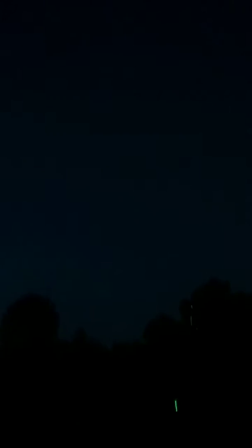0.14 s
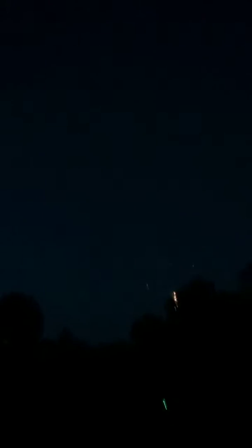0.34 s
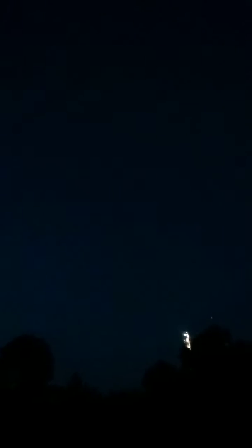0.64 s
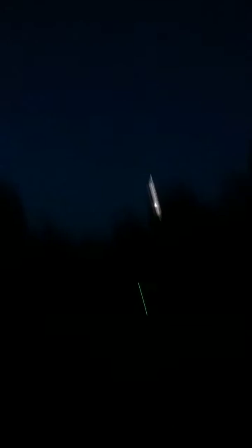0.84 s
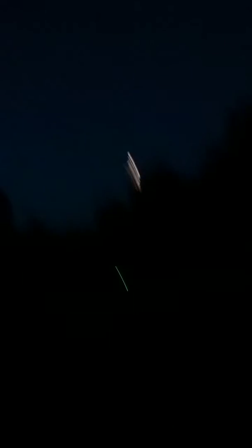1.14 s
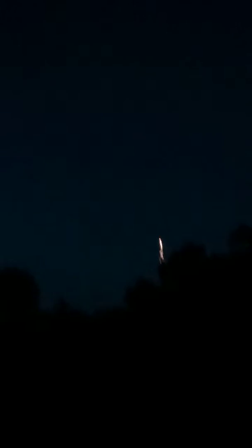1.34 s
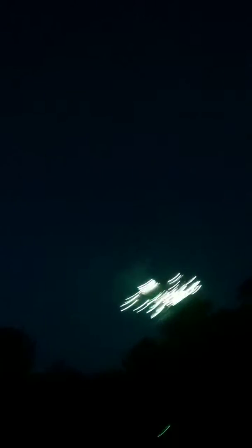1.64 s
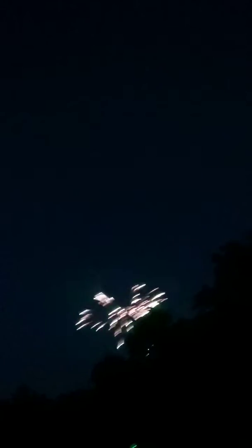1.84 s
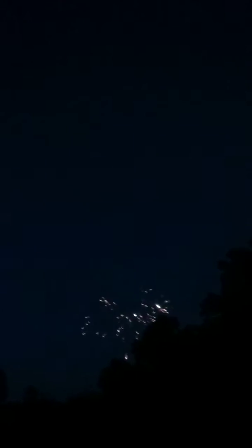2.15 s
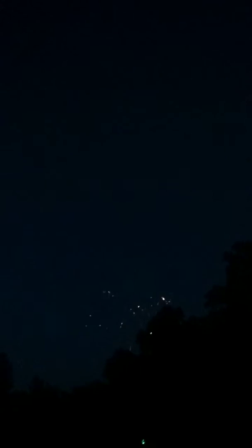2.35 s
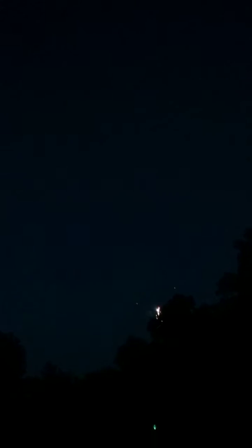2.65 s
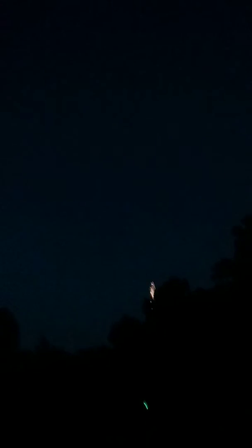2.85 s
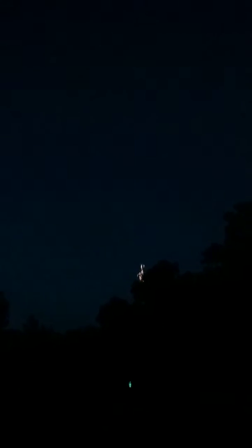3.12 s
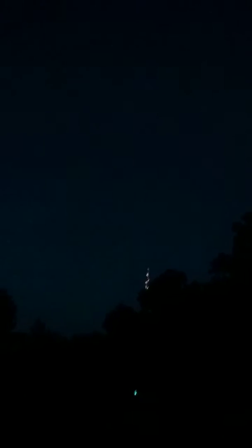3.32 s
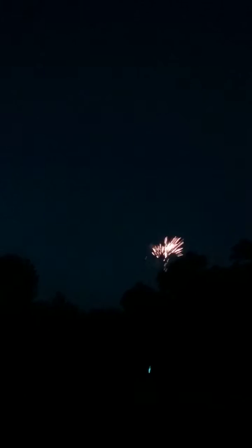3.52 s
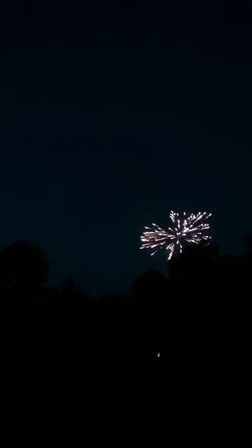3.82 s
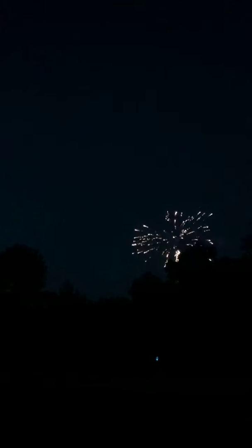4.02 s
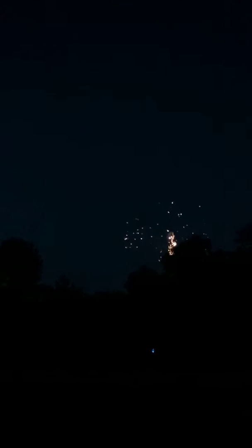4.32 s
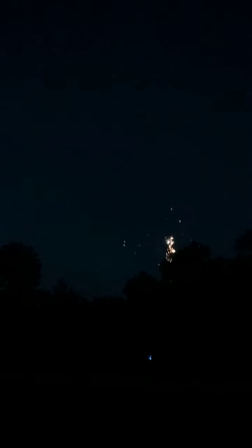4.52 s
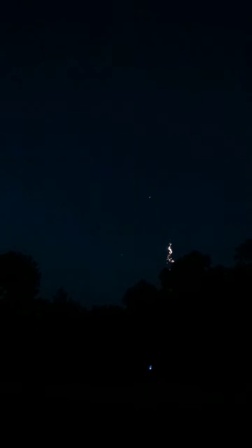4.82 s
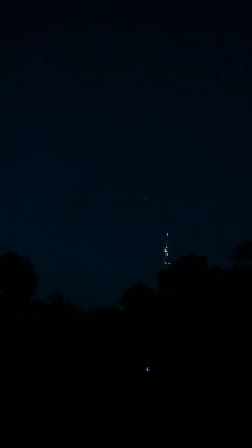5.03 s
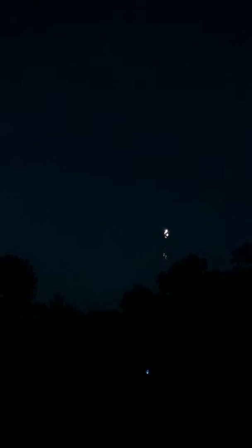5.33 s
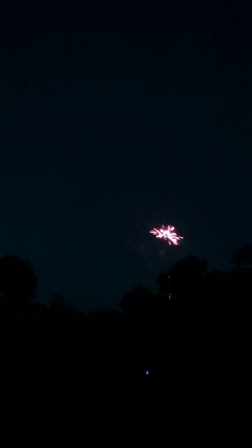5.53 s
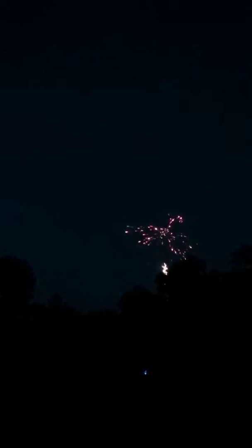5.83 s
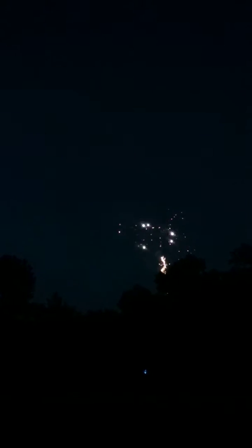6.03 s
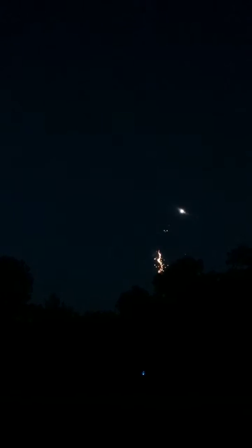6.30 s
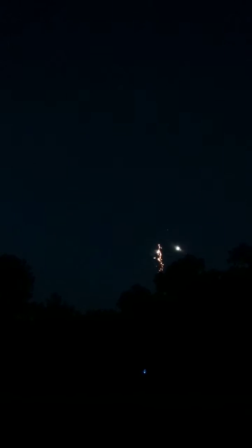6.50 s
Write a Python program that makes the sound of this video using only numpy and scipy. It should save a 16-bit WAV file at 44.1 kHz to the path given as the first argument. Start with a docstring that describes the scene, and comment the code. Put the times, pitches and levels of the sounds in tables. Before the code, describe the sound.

Fireworks over a dark tree-ringed field: dense crackling, then three overloaded bangs about two seconds apart, each echoing off trees and rolling away.

```python
"""A field ringed by trees at night: fireworks, received by a small stereo microphone.
Lift charges launch shells as short pressure waves; burning tails are noise through fluttering resonances.
Stars and sparks are impulses coloured by resonances; bursts are N-waves loud enough to overload the input.
Each burst slaps back once, scatters in the trees as single echoes and decaying noise, and rolls away."""
import sys
import numpy as np
from scipy import signal
from scipy.io import wavfile

SR = 44100
rng = np.random.default_rng(int(sys.argv[2]) if len(sys.argv) > 2 else 0)


def store_pcm(level_fs):
    """Save levels as 16-bit WAV."""
    pcm = np.round(np.clip(level_fs, -1, 1) * 32767).astype(np.int16)
    wavfile.write(sys.argv[1], SR, np.atleast_2d(pcm).T)


N = 293706
TIME = np.arange(N) / SR   # s
COARSE_TIME = TIME[::32]   # s, for slow envelopes

# Levels are relative within each layer, ahead of its filters and gains.
# night air: f/Hz, spectral density level/dB
NIGHT_AIR = [(25, -51), (60, -5.5), (150, -3.5), (400, 0), (700, 6.5), (1200, -4), (3000, -13.5),
             (6000, -63), (15000, -50)]
# scatter from the trees: f/Hz, spectral density level/dB, decay time t60/s
TREE_SCATTER = [(30, -30, 0.45), (70, -7, 0.79), (149, -1.5, 1.18), (354, 3, 0.85), (790, 0, 1.25),
                (1140, -8, 1.77), (1590, -5, 1.62), (2040, -6.5, 1.37), (3630, -8, 0.97), (5270, -18, 0.83),
                (7350, -83, 0.28), (15000, -112, .5)]
# distant roll: f/Hz, spectral density level/dB, decay time t60/s
DISTANT_ROLL = [(30, -12, 2), (82.5, -17.5, 3.1), (176, -2, 5.2), (356, 0, 5.03), (730, -3, 3.85),
                (1030, -6.5, 2), (2450, -26, 7.9), (6000, -55, 1.8), (15000, -73, 1)]
# diffuse sound: f/Hz, left-right likeness/1, left-right level/dB
DIFFUSE_FIELD = [(60, 0.94, -1), (296, 0.97, 2.5), (620, 0.88, 3), (1270, 0.86, 5.5), (1950, 0.03, 4),
                 (3820, 0.03, -1.5), (6340, 0.067, -8), (12000, 0.17, 12)]
# microphone port resonances, left list then right list: f/Hz, width/Hz, level/dB
PORT_MODES = [
    [(614, 160, 0), (847, 254, 2.5), (1165, 62, 3), (1787, 144, 5), (3420, 1360, 2), (3560, 370, 9.5),
     (5000, 200, -52)],
    [(656, 240, -11), (848, 77, 3.5), (1420, 42, -6.5), (2047, 62, 8), (3080, 1900, 6), (3720, 780, 9),
     (4570, 220, -1.5), (5500, 3100, -6)],
]
# upper resonances of the burning jet: f/Hz, width/Hz, level/dB
HISS_MODES = [(4190, 870, 1.5), (5680, 920, -7)]
# lower resonances of the burning jet: f/Hz, width/Hz, level/dB
RUSH_MODES = [(1890, 580, -2.5), (2924, 360, 2)]
# burning tail of each climbing shell:
# full flame from t/s, until t/s, swell/(dB/s), high hiss level/dB, lower rush level/dB
CLIMBING_TAILS = [(1.645, 1.94, 28, -39.5, -36), (3.506, 4.004, 27, -43, -37.5),
                  (5.69, 5.894, 18.5, -43, -37.5), (6.4, 6.7, 38, -55, -50)]
# showers of sparks: thickest at t/s, build-up/s, fade/s, snap level/dB, pop level/dB
SPARK_SHOWERS = [(.345, 0.037, 0.028, -35, -26), (0.449, 0.041, 0.053, -27, -20.5),
                 (0.801, 0.5, 0.29, -40.5, -37.5), (1.24, 0.29, 0.28, -29, -27),
                 (3.22, 0.34, 0.19, -38, -50), (4.7, 0.4, 0.3, -35, -46), (6.28, 0.23, 0.5, -35.5, -44),
                 (6.635, 0.031, .1, -26.5, -23)]
# loudest crackling stars: t/s, peak level/dB, left-right level/dB, nominal colour f/Hz
STAR_CRACKS = [(0.2083, -28.5, 2, 2980), (0.2631, -22, 1, 2660), (0.2713, -22, 6, 2930),
               (0.2908, -15.5, 6, 2700), (0.3075, -17, -5, 2760), (0.3132, -22, 6, 2400),
               (0.328, -26, 0, 2200), (0.333, -27, 3, 2800), (0.3404, -13.5, 8, 2370),
               (0.3468, -14, 1, 2660), (0.36, -21, -1, 2580), (0.38, -21, 5, 2600),
               (0.3442, -19, -11, 2740), (0.3517, -16.5, 12, 2740), (0.3967, -16.5, 1, 2670),
               (0.404, -27, 3, 2780), (0.4187, -20, 2, 3080), (0.425, -19, 5, 2690),
               (0.4335, -13.5, -1, 2900), (0.4425, -16, 5, 3060), (0.456, -12, 1, 2640),
               (0.464, -21, 4, 2700), (0.4737, -23, 7, 2790), (0.483, -19.5, 1, 2930),
               (0.496, -20.5, 7, 3150), (0.5114, -21.5, 1, 2500), (0.523, -25, 5, 3160),
               (0.5755, -24, 7, 2800), (0.5646, -18.5, 3.5, 1610), (0.6131, -18.5, 1, 2540),
               (0.654, -20.5, 7, 2870), (0.721, -23, 5, 2080), (0.7504, -14.5, 7, 2600),
               (0.778, -22, 2, 2050), (0.792, -14.5, 2, 1820), (0.8456, -10, 1.5, 2300),
               (0.916, -25, 16, 3100), (0.9707, -12.5, 0, 2040), (0.9959, -19.5, 10, 3000),
               (1.011, -27, 15, 2800), (1.035, -23, 13, 2880), (1.089, -18.5, 18.5, 3270),
               (1.105, -22.5, -5, 2530), (1.157, -23, 7, 3000), (1.183, -13.5, -4, 2840),
               (1.1874, -12, 8, 3100), (1.198, -17, 16, 3160), (1.2024, -13, 3, 3360),
               (1.21, -12.5, -4, 3200), (1.2176, -11, 4, 3300), (1.2625, -8, 10, 2520),
               (1.2674, -4, -5, 3100), (1.2785, -8.5, 4, 2640), (1.2833, -10.5, -8, 3300),
               (1.2925, -7.5, 8, 2220), (1.2947, -15, -11, 2110), (1.3078, -11.5, 1, 3750),
               (1.3363, -6.5, -3, 3320), (1.3485, -13, 6, 3200), (1.3636, -17, -2, 3100),
               (1.371, -3, 1, 3280), (1.4138, -3.5, -3, 3360), (1.4974, -7, -2, 3220),
               (1.517, -17.5, 4, 3000), (1.574, -2.5, 0.5, 2810), (1.6033, -13, 1, 2780),
               (1.7581, -10, 1, 2620), (2.1519, -12, -0.5, 2600), (2.2103, -13.5, -5, 2630),
               (2.4647, -19.5, -3, 2580), (2.825, -28, 1, 2500), (2.9536, -33, -1, 3600),
               (3.032, -30, -6, 3400), (3.075, -28.5, 0, 3400), (3.147, -23, -3, 3540),
               (3.1955, -22.5, -5, 3200), (3.2027, -21, 3, 2940), (3.2086, -25, 3, 3650),
               (3.2223, -23, 1, 3500), (3.2355, -22, 2, 3330), (3.2447, -27, -2, 3880),
               (3.3222, -16, 0, 3180), (3.4295, -12.5, -1, 2950), (3.447, -21, -2, 3000),
               (3.4638, -15, 2, 2700), (3.5347, -18.5, 10, 2600), (3.5452, -7.5, 2, 2960),
               (3.5852, -19, 2, 2900), (4.3996, -22, 1, 3060), (4.511, -23, 2, 2600),
               (4.5761, -25, 3, 2700), (4.5901, -24.5, 0, 2800), (4.6306, -27, 16, 2500),
               (4.637, -18.5, 2, 2570), (4.6945, -23, 0, 3300), (4.703, -21.5, 5, 2740),
               (4.721, -23.5, 1, 3100), (4.751, -17.5, 1, 2890), (4.7823, -27, 1, 3200),
               (4.811, -22, 2, 2950), (4.8252, -24.5, -3, 2780), (4.8375, -31, 2, 3000),
               (4.8486, -19.5, -2, 2950), (4.879, -19, 3, 2750), (4.8881, -23, -3, 2890),
               (4.9076, -23.5, -1, 2980), (4.9424, -23, -2, 2730), (4.9902, -27, 1, 3200),
               (5.0376, -21, 7, 2800), (5.0428, -17.5, -1, 3250), (5.061, -15, 0, 3000),
               (5.069, -18, -1, 2820), (5.0975, -20, 4, 2840), (5.193, -22.5, 2, 3100),
               (5.5498, -11, 1, 2900), (5.7157, -20, 2, 3020), (5.8662, -8, 4.5, 2690),
               (5.9434, -20.5, 6, 2210), (6.1016, -5, -3, 2880), (6.2314, -27, 2, 2490),
               (6.3206, -12.5, 1, 2600), (6.333, -23, -2, 2980), (6.3903, -32, -2, 3000),
               (6.449, -28, -6, 3080), (6.533, -22.5, 2, 3000), (6.5471, -16, -5, 2630),
               (6.5538, -13, 1, 2900), (6.5609, -26, -1, 3000), (6.5939, -21, 4, 2600),
               (6.6, -20, -2, 2940), (6.606, -13.5, 1, 2790), (6.6127, -25, -1, 2700),
               (6.6333, -17.5, 6, 2820), (6.6431, -16.5, 3, 3000), (6.6502, -10.5, -4, 3200)]
# rings after a crack, the upper ones mainly on the right: f/Hz, width/Hz, left level/dB, right level/dB
STAR_RINGS = [(1170, 91, 4, 2), (1855, 400, -13, -8), (3914, 650, -23, 5), (5500, 900, -20, 4)]
# soft, dull thuds behind the crackle: t/s, level/dB, f/Hz
DULL_THUDS = [(0.759, -41, 328), (0.821, -36, 420), (0.839, -50, 110), (.86, -42, 300), (1.271, -34, 410),
              (1.282, -44.5, 149), (1.297, -39, 330), (5.186, -48, 102)]
# lift charges: t/s, blast level/dB, pulse length/ms, dull above f/Hz,
# slap delay/ms, slap f/Hz, slap level/dB, tree scatter level/dB
LIFT_CHARGES = [(1.849, -12, 0.81, 2600, 10.3, 290, -12.5, -17.5),
                (3.5421, -14.5, 0.91, 2600, 9.5, 277, -15, -15),
                (5.2993, -19, 0.66, 3640, 8.5, 275, -18.5, -15)]
# strong returns from the tree line: t/s, level/dB, f/Hz
TREE_RETURNS = [(1.972, -15, 846), (1.981, -18.5, 192), (2.0140, -14, 587), (4.0125, -11, 700),
                (4.015, -17, 1450), (4.0225, -12.5, 520), (4.024, -20, 235), (4.034, -23, 179),
                (4.068, -33, 600), (4.135, -21, 716), (6.0400, -17, 880), (6.046, -16, 560),
                (6.158, -31, 900), (6.2010, -29, 288)]
# thick stands of branches that return a bright rattle: t/s, fade/s, level/dB
BRANCH_RATTLES = [(1.953, 0.032, -32), (4.001, 0.037, -18.5), (4.125, 0.028, -24), (6.036, 0.028, -28)]
# a shell that burst before the start:
# t/s, tree scatter level/dB, far roll level/dB, scatter tilt/(dB/octave), body f/Hz
PAST_BURST = (-.3, -2, -3, -.5, 780)
# shell bursts: t/s, blast level/dB, pulse length/ms, slap delay/ms, slap level/dB, tree scatter level/dB,
# far roll level/dB, scatter tilt/(dB/octave), body f/Hz, bounce delay/ms, knock f/Hz, knock level/dB,
# slap f/Hz, ground thud level/dB
SHELL_BURSTS = [(1.9177, 12, 0.65, 9, 1, -2, -1, -0.5, 715, 1.13, 538, 6, 504, -17),
                (3.9637, 11, 0.422, 10.1, -2.5, -0.5, 2, 0.1, 670, 1.37, 493, 9.5, 470, -12),
                (5.9707, 8.5, .55, 9.45, -0.5, -4.5, -5.5, 0.75, 920, 1.2, 844, 9.5, 510, -22)]

PORT_LAG_MS = 0.08
WALL_ECHO_MS, WALL_ECHO_DB = 10, -4   # a surface close by repeats what arrives from afar
BODY_DB, BODY_OCTAVES = 6, 0.26   # the echoes of a burst are strongest round its body pitch
MUZZLE_SCATTER_S = 0.014   # the scatter of a lift charge follows its first echo
# the roll drops once the farthest trees have answered
ROLL_END_S, ROLL_END_FADE_S, ROLL_END_DB = 1.144, 0.03, -5
BURN_OUT_DB_PER_S = 40
EMBER_HISS_DB, EMBER_RUSH_DB = -54, -50   # embers never quite stop hissing
FIZZ_DB = -11.5   # rush of a shower, relative to the size of its snaps
HISS_PAN_DB, RUSH_PAN_DB = -2, 1.4   # left-right
SNAPS_PER_S, POPS_PER_S = 220, 100   # mean rates where a shower is thickest, before clumping
STRAY_SNAPS_PER_S, STRAY_DB = 11, -59   # between showers
EDGE_RISE_DB = 1   # sparks are this much larger one build-up or fade time from the thickest moment
CRACK_WIDTH_HZ, CRACK_TOP_HZ = 2280, 4350   # a crack is a quick swing; its top shifts with its colour
CRACK_BOUNCE_MS, CRACK_BOUNCE_DB = 2.2, -7.5   # bounce off the ground; the delay varies among stars
# the crackle is hollow between its low pop and its high snap
CRACK_DIP_HZ, CRACK_DIP_WIDTH_HZ, CRACK_DIP_SHARE = 2570, 260, 0.56
BRANCHES_PER_S, BRANCH_DB, BRANCH_T60_S = 890, -26, 1   # branches return a report as a dense rattle
STOPBAND_HZ = 16900


def from_db(db):
    """Level definition: amplitude ratio is ten to the power of level over twenty."""
    return 10 ** (np.asarray(db) / 20)


def rms_one(x):
    """Normalisation: division by the root mean square."""
    return x / np.sqrt(np.mean(x ** 2) + 1e-20)


def at_hz(rows, hz):
    """Spectral interpolation: each column is linear in log frequency."""
    points, *columns = np.transpose(rows)
    return [np.interp(np.log(hz), np.log(points), column) for column in columns]


def cut(x, hz, kind, order=2):
    """Causal Butterworth filtering: a maximally flat passband."""
    sections = signal.butter(order, hz, kind, fs=SR, output="sos")
    return signal.sosfilt(sections, x + 1e-18)


def resonate(x, hz, width_hz):
    """Damped resonance: a conjugate pole pair with a gain of about 1 at its peak."""
    radius = np.exp(-np.pi * width_hz / SR)
    zeros = np.array([1, 0, -1]) * (1 - radius * radius) / 2
    poles = [1, -2 * radius * np.cos(2 * np.pi * hz / SR), radius * radius]
    return signal.lfilter(zeros, poles, x + 1e-18)


def drift(per_s, times=TIME):
    """Slow random fluctuation: normal values of unit spread joined by straight lines."""
    knots = rng.standard_normal(4096)
    return np.interp(times * per_s, np.arange(len(knots)), knots)


def pan(left_db):
    """Interchannel level difference: half is given to the left, half taken from the right."""
    return from_db(np.array([[.5], [-.5]]) * left_db)


def delayed(x, ms):
    """Propagation delay: the same wave, arriving later."""
    def shift(wave):
        return np.interp(TIME - ms / 1000, TIME, wave, left=0)
    return np.apply_along_axis(shift, -1, x)


def through_ports(x, leak_db):
    """Cavity resonance: a sharp wave rings each port, the right one later; some passes straight through."""
    rung = []
    for side, modes in zip(np.broadcast_to(x, (2, N)), PORT_MODES):
        # neighbouring modes alternate in polarity
        rung.append(sum((-1) ** k * from_db(db) * resonate(side, hz, width)
                        for k, (hz, width, db) in enumerate(modes)))
    left, right = rung
    return np.array([left, delayed(right, PORT_LAG_MS)]) + from_db(leak_db) * x


def shock(s, length_ms):
    """The N-wave of a blast: a jump up to 1, a straight fall, a jump back."""
    phase = (TIME - s) * 1000 / length_ms
    return np.where((phase >= 0) & (phase < 1), 1 - 2 * phase, 0)


def dull_echo(s, hz, cycles):
    """Treble-poor reflection: a few swings whose envelope reaches 1 after the given cycles and dies away."""
    out = np.zeros(N)
    span = slice(int(s * SR), int(s * SR) + SR // 4)
    turns = (TIME[span] - s) * hz
    age = turns / cycles
    out[span] = -np.sin(2 * np.pi * turns) * (age * np.exp(1 - age)) ** 2
    return out


def random_clicks(per_s, size_db, spread_db):
    """Poisson-like impulses: random moments, mostly small sizes, each from a direction of its own."""
    born = np.flatnonzero(rng.random(N) < per_s / SR)
    sign = rng.choice([-1, 1], N)
    size = np.minimum(rng.exponential(1, N), 3)
    left_db = rng.normal(0.93, 10.2, N)
    out = np.zeros((2, N))
    gain = from_db(size_db[born] + spread_db * size[born])
    out[:, born] = sign[born] * gain * pan(left_db[born])
    return out


def diffuse_bands():
    """Diffuse field: third-octave bands of white noise (Hz, stereo) with a set left-right coherence."""
    edges = 25 * 2 ** (np.arange(29) / 3)
    white = rng.standard_normal((2, 2, N))
    for k, (low, high) in enumerate(zip(edges, edges[1:])):
        hz = np.sqrt(low * high)
        # neighbouring bands use different noise
        mid, side = cut(white[k % 2], [low, high], "band")
        alike, left_db = at_hz(DIFFUSE_FIELD, hz)
        stereo = np.sqrt(1 + alike) * mid + np.sqrt(1 - alike) * side * [[1], [-1]]
        yield hz, pan(left_db) * stereo


def echo_power(s, db, t60, arrival_s, build_s):
    """Reverberant power: many small echoes build up after a report and decay exponentially."""
    age = np.maximum(COARSE_TIME - s - arrival_s, 0)
    return from_db(db - 60 * age / t60) ** 2 * (1 - np.exp(-age / build_s)) ** 2


def landscape():
    """Scattering and reverberation: reports spread in the trees, then roll, over the rush of the night."""
    out, lumps = 0, drift(70, COARSE_TIME)
    reports = [PAST_BURST] + [(row[0], *row[5:9]) for row in SHELL_BURSTS]
    for hz, noise in diffuse_bands():
        tree_db, tree_t60 = at_hz(TREE_SCATTER, hz)
        roll_db, roll_t60 = at_hz(DISTANT_ROLL, hz)
        octaves = np.log2(hz / 700)
        power = from_db(at_hz(NIGHT_AIR, hz)[0] - 43.0) ** 2
        for s, near_db, far_db, tilt_db, body_hz in reports:
            body = np.exp(-(np.log2(hz / body_hz) / BODY_OCTAVES) ** 2)
            scatter_db = tree_db + near_db + tilt_db * octaves + BODY_DB * body
            # ground: lows swell later
            power = power + echo_power(s, scatter_db - 7.0, 0.08, arrival_s=0.0019, build_s=1.2 / hz)
            power = power + echo_power(s, scatter_db - 15.5, tree_t60, arrival_s=0.026, build_s=0.0037)
            ended = np.clip((COARSE_TIME - s - ROLL_END_S) / ROLL_END_FADE_S, 0, 1)
            far_roll_db = roll_db + far_db - 22 + ROLL_END_DB * ended
            power = power + echo_power(s, far_roll_db, roll_t60, arrival_s=0.074, build_s=0.34)
        for s, *_, near_db in LIFT_CHARGES:   # a muzzle pop is duller than a burst
            muzzle_db = tree_db + near_db - 9.5 - 0.7 * max(octaves, -2)
            power = power + echo_power(s, muzzle_db, 0.89, arrival_s=MUZZLE_SCATTER_S, build_s=0.001)
        # echoes come in lumps, partly shared by all bands
        swell = np.sqrt(power) * from_db(1.13 * lumps + 1.6 * drift(40, COARSE_TIME))
        out = out + noise * np.interp(TIME, COARSE_TIME, swell)
    return out


def hollowed(x):
    """Interference: a near surface returns the middle register later, so the roll sounds hollow."""
    return x + from_db(WALL_ECHO_DB) * delayed(resonate(x, 358, 410), WALL_ECHO_MS)


def jet(modes):
    """Turbulent jet noise: flow noise excites a few broad, fluttering resonances; rms 1."""
    flow = rng.standard_normal(N) + 18.0 * rng.standard_normal((2, N))   # mostly independent sides
    rush = 0
    for k, (hz, width, db) in enumerate(modes):
        flutter = from_db(db + 2.23 * drift(18))
        rush = rush + (-1) ** k * flutter * resonate(flow, hz, width)
    return rms_one(cut(rush, 5590, "low", order=10) + from_db(-37.0) * flow)


def shower_distance(peak_s, build_s, fade_s):
    """Normalised time: distance from the thickest of a shower in build-up or fade times."""
    return np.maximum((peak_s - TIME) / build_s, (TIME - peak_s) / fade_s)


def hiss():
    """Addition of powers: tails swell, hold and burn out as high hiss and low rush; showers add rush."""
    high, low = from_db(EMBER_HISS_DB) ** 2, from_db(EMBER_RUSH_DB) ** 2
    for full_s, end_s, swell_db_per_s, hiss_db, rush_db in CLIMBING_TAILS:
        swell_db = -swell_db_per_s * np.maximum(full_s - TIME, 0)
        flame_db = swell_db - BURN_OUT_DB_PER_S * np.maximum(TIME - end_s, 0)
        high = high + from_db(hiss_db + flame_db) ** 2
        low = low + from_db(rush_db + flame_db) ** 2
    for *timing, snap_db, _ in SPARK_SHOWERS:
        low = low + from_db(snap_db + FIZZ_DB) ** 2 * np.exp(-shower_distance(*timing) ** 2)
    high_hiss = np.sqrt(high) * from_db(0.5) * pan(HISS_PAN_DB) * jet(HISS_MODES)
    low_rush = np.sqrt(low) * from_db(-6.0) * pan(RUSH_PAN_DB) * jet(RUSH_MODES)
    return high_hiss + low_rush


def thuds():
    """Low-frequency pulses: dull thuds with little treble."""
    return sum(from_db(db) * dull_echo(s, hz, cycles=0.87) for s, db, hz in DULL_THUDS)


def sparks():
    """Clustered impulses: showers of bright snaps and duller pops, each bouncing off the ground."""
    away = np.array([shower_distance(*row[:3]) for row in SPARK_SHOWERS])
    density = np.exp(-away ** 2)
    snap_db, pop_db = np.transpose(SPARK_SHOWERS)[3:, :, None] + EDGE_RISE_DB * away
    clumps = from_db(2.8 * drift(40))
    snap_rate = SNAPS_PER_S * density.sum(axis=0) + STRAY_SNAPS_PER_S
    # mean size, weighted by the rate of each shower and of the strays
    weighted_db = SNAPS_PER_S * (density * snap_db).sum(axis=0) + STRAY_SNAPS_PER_S * STRAY_DB
    snap_db = weighted_db / snap_rate
    pop_db = np.average(pop_db, axis=0, weights=density + 1e-18)
    snaps = random_clicks(snap_rate * clumps, snap_db, spread_db=3.5)
    pops = random_clicks(POPS_PER_S * density.sum(axis=0) * clumps, pop_db, spread_db=3.0)
    both = snaps + from_db(14.5) * resonate(pops, 1270, 690)
    both = both + from_db(CRACK_BOUNCE_DB) * delayed(both, CRACK_BOUNCE_MS)
    return from_db(10.5) * cut(through_ports(both, leak_db=-16.0), 7150, "low", order=4)


def stars():
    """Impulse response: a coloured crack, its ground bounce and quick reflections, then spray from trees."""
    age, out = TIME[:SR // 6], np.zeros((2, N + SR))
    shape = (2, len(age))
    for s, db, left_db, hz in STAR_CRACKS:
        sparse = rng.random(len(age)) < .15
        reflections = rng.standard_normal(shape) * sparse * from_db(-11.5 - 60 * age / 0.027)
        spray = rng.standard_normal(shape) * np.minimum(age / 0.013, 1) * from_db(-41 - 60 * age / .5)
        arrival = reflections + spray
        arrival[:, 0] -= 1   # the direct crack
        bounce = int(CRACK_BOUNCE_MS * rng.uniform(.85, 1.15) * SR / 1000)
        arrival[:, bounce] -= from_db(CRACK_BOUNCE_DB)
        ring_hz = 0.81 * hz * (hz / 2800) ** 0.45
        top_hz = CRACK_TOP_HZ * (hz / 2800) ** 1.16
        colour = resonate(arrival, ring_hz, CRACK_WIDTH_HZ) + from_db(-13) * arrival
        colour = cut(colour, top_hz, "low", order=3)
        start = int(s * SR)
        out[:, start:start + len(age)] += from_db(db) * pan(left_db) * colour / np.abs(colour).max()
    out = out[:, :N]
    rings = sum(from_db([[left_db], [right_db]]) * resonate(out, hz, width)
                for hz, width, left_db, right_db in STAR_RINGS)
    return from_db(-4.5) * pan(2.8) * out + from_db(-4.0) * rings


def crackle():
    """Small-source radiation: stars and sparks are too small to make much bass."""
    both = cut(stars() + sparks(), 450, "high")
    return both - CRACK_DIP_SHARE * resonate(both, CRACK_DIP_HZ, CRACK_DIP_WIDTH_HZ)


def launches():
    """Impulsive excitation: a lift charge pops, its tube booms briefly, and two round echoes follow."""
    direct = sum(from_db(db) * cut(shock(s, ms), top_hz, "low") for s, db, ms, top_hz, *_ in LIFT_CHARGES)
    out = pan(3.3) * through_ports(direct, leak_db=2)
    for s, _, _, _, slap_ms, slap_hz, slap_db, _ in LIFT_CHARGES:
        first = dull_echo(s + slap_ms / 1000, slap_hz, cycles=0.45)
        boom = from_db(-20.0) * dull_echo(s + 0.0136, 178, cycles=1.9)
        boom = boom + from_db(-14.0) * dull_echo(s + 0.037, 178, cycles=1.9)
        second = from_db(-6.0) * dull_echo(s + 0.0347, 262, cycles=0.63)
        out += pan(1.3) * from_db(slap_db) * (first + boom + second)
    return out


def tree_line():
    """Discrete reflection: dense stands of trees return a burst as short, dull knocks."""
    return pan(1.8) * sum(from_db(db) * dull_echo(s, hz, cycles=0.63) for s, db, hz in TREE_RETURNS)


def branches():
    """Multiple scattering: countless sharp echoes after each burst, surging where branches stand thick."""
    clicks = 0
    for s, _, _, _, _, trees_db, *_ in SHELL_BURSTS:
        age = TIME - s
        size_db = BRANCH_DB + trees_db - 60 * np.abs(age) / BRANCH_T60_S
        clicks = clicks + random_clicks(BRANCHES_PER_S * (age > .036), size_db, spread_db=4.0)
    surge = sum((TIME > s) * from_db(db) * np.exp(-np.abs(TIME - s) / fade_s)
                for s, fade_s, db in BRANCH_RATTLES)
    clicks = clicks + surge * random_clicks(2500, np.zeros(N), spread_db=1.0)
    rattle = through_ports(clicks, leak_db=-11) + from_db(-3) * resonate(clicks, 1530, 300)
    return from_db(12.0) * cut(cut(rattle, 400, "high"), 3580, "low", order=4)


def bursts():
    """Shock and reflection: N-waves with ground bounces, a hollow knock, a near slap and tree echoes."""
    direct, trunks, out = 0, np.zeros(N), np.zeros((2, N))
    for row in SHELL_BURSTS:
        s, db, length_ms, slap_ms, slap_db, trees_db = row[:6]
        bounce_ms, knock_hz, knock_db, slap_hz, thud_db = row[9:]
        blast = shock(s, length_ms)
        blast = (blast + from_db(-18.5) * delayed(blast, bounce_ms)
                 + from_db(-9.5) * delayed(blast, 2.2) + from_db(-9.0) * delayed(blast, 3.1))
        blast = from_db(db) * cut(blast, 410, "high")
        direct = direct + blast
        knock = from_db(knock_db) * pan(3.5) * resonate(blast, knock_hz, 106)
        slap = pan(4.4) * dull_echo(s + slap_ms / 1000, slap_hz, cycles=0.65)
        thud = from_db(thud_db) * dull_echo(s + 0.0091, 143, cycles=0.73)
        bounce = from_db(-25 + trees_db) * dull_echo(s + 0.0476, 92, cycles=0.48)
        out += knock + from_db(slap_db) * (slap + thud) + bounce
        # single trees throw back separate echoes, weaker the further off they stand
        late = 0.036 + 0.32 * rng.random(36) ** 1.6
        places = np.minimum(((s + late) * SR).astype(int), N - 1)
        trunks[places] += from_db(trees_db + 5.0 - 60 * late) * rng.normal(0, 1, len(late))
    tree_echoes = pan(4.5) * cut(resonate(trunks, 730, 390), 1230, "low")
    return out + through_ports(direct, leak_db=-16.5) + tree_echoes


def scene():
    """Superposition: the pressures of all sources add at the two microphones."""
    background = from_db(-.5) * hollowed(landscape()) + hiss()
    small_sources = thuds() + crackle() + launches()
    return background + small_sources + tree_line() + branches() + bursts()


def record(dry):
    """Saturation and band limiting: loud bangs overload the input; deepest bass and top are cut."""
    clipped = dry / (1 + (dry / .92) ** 4) ** (1 / 4)
    clipped = cut(clipped, 38, "high")
    top_cut = signal.cheby2(14, 60, STOPBAND_HZ, fs=SR, output="sos")
    return signal.sosfilt(top_cut, clipped)


dry = scene()
out = record(dry)
store_pcm(out)
```